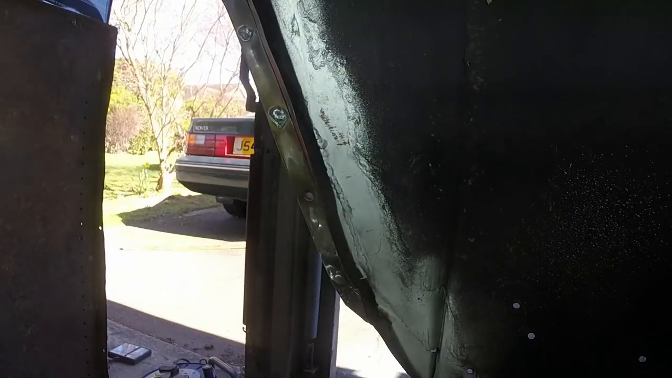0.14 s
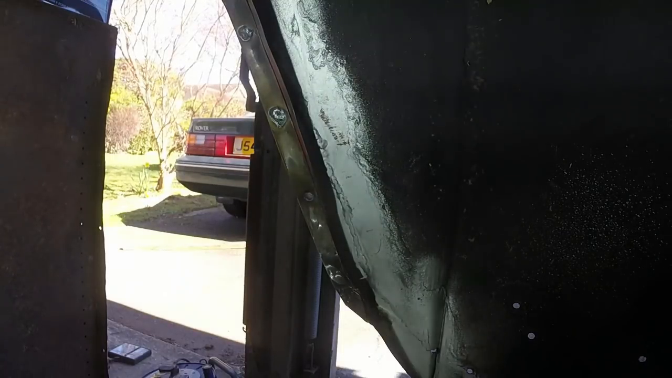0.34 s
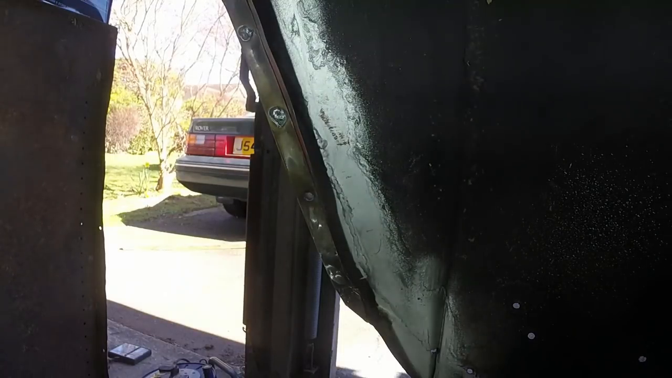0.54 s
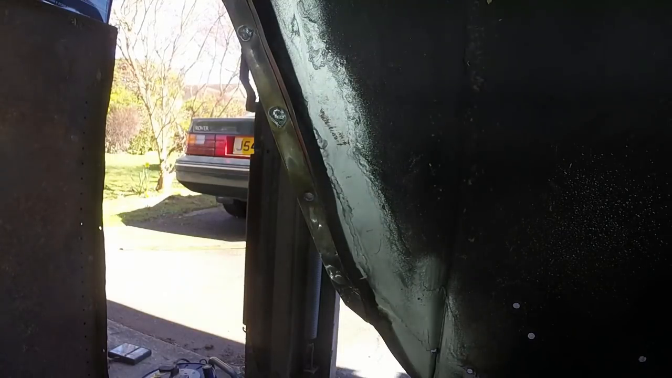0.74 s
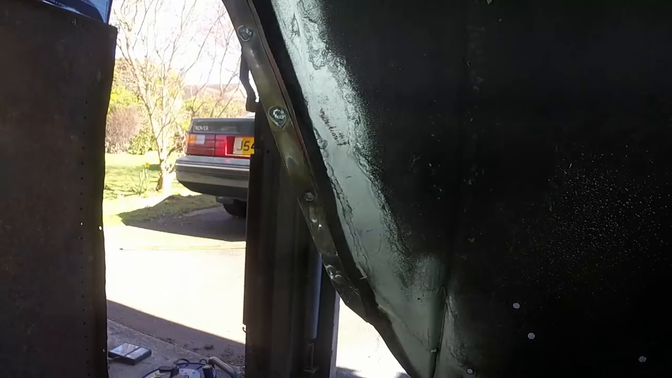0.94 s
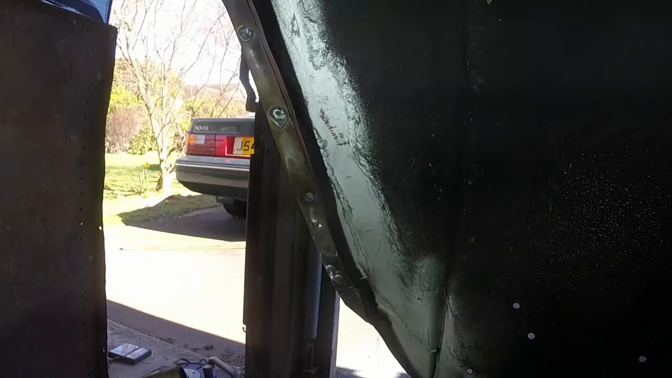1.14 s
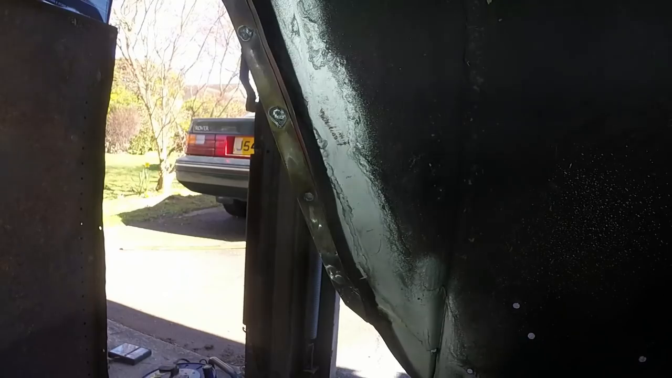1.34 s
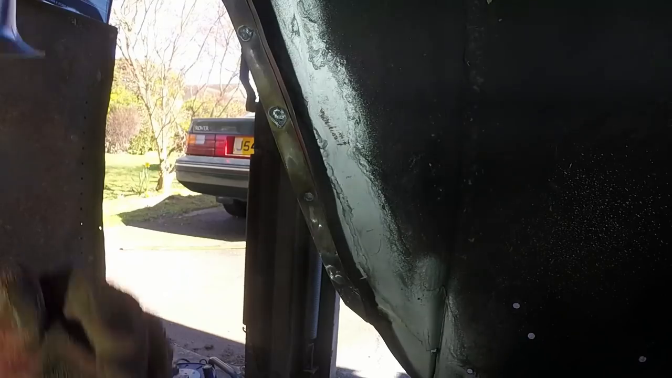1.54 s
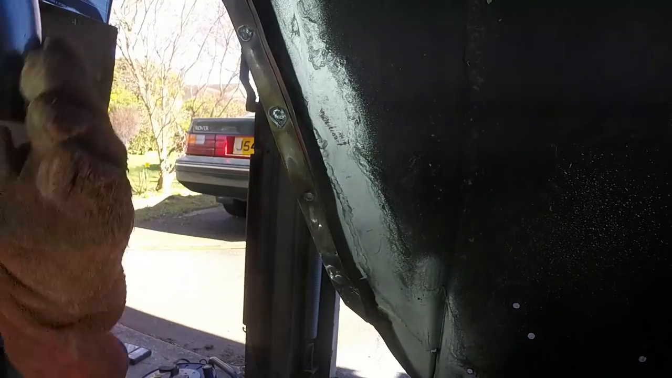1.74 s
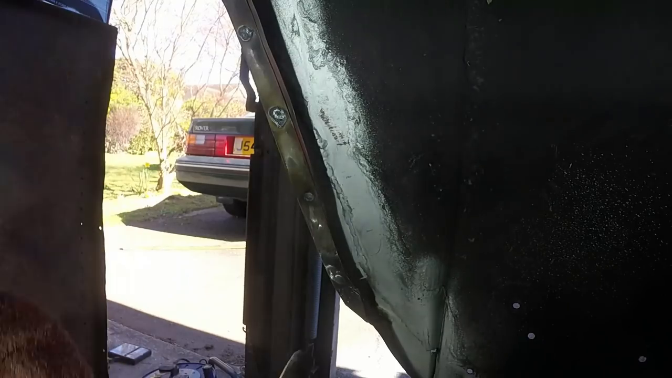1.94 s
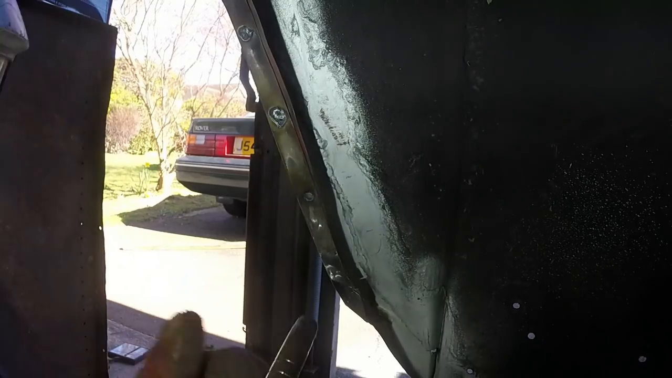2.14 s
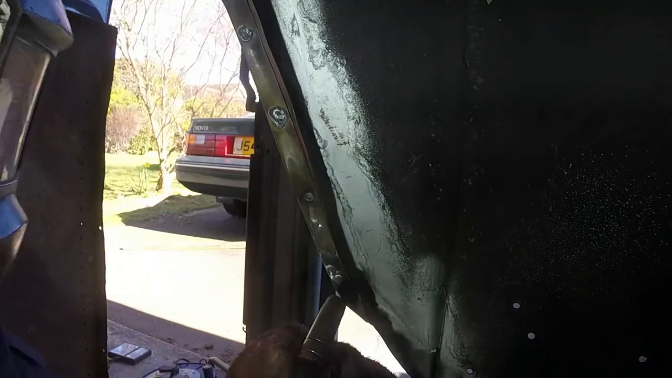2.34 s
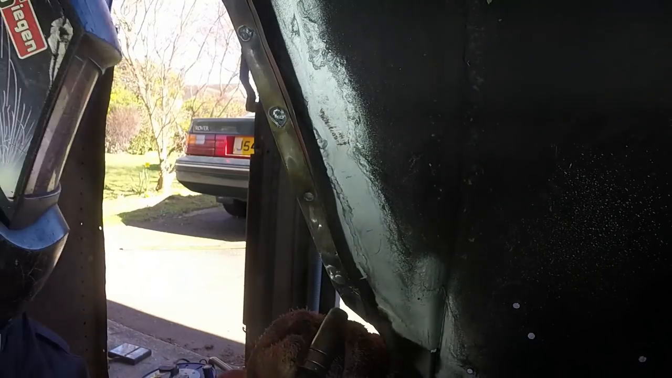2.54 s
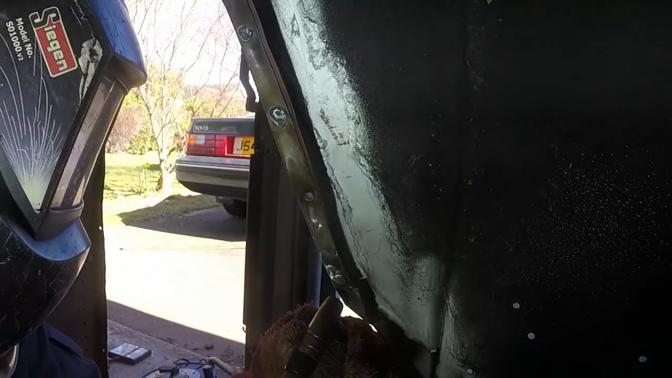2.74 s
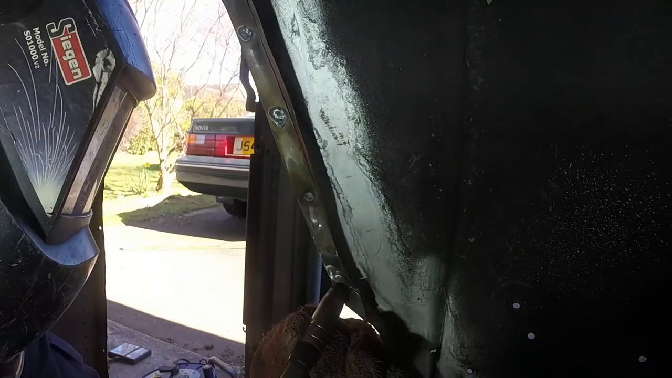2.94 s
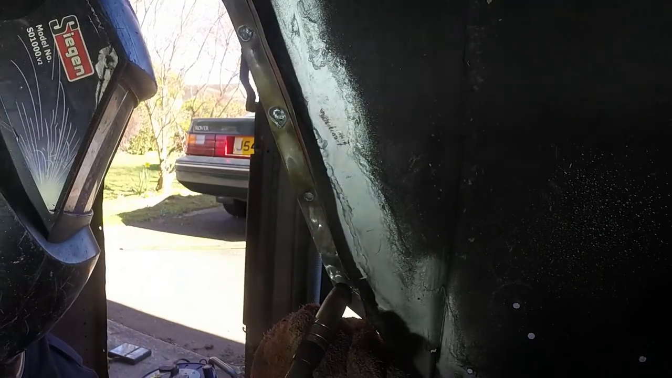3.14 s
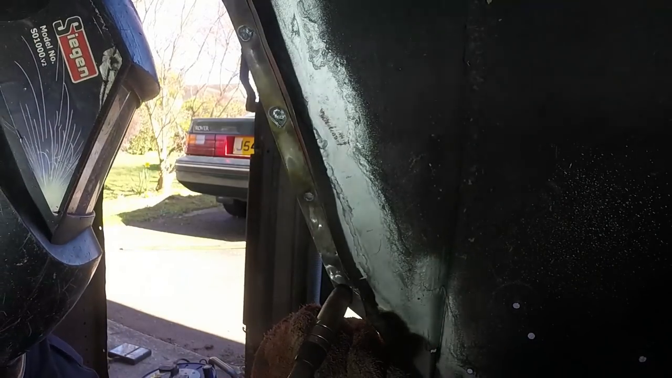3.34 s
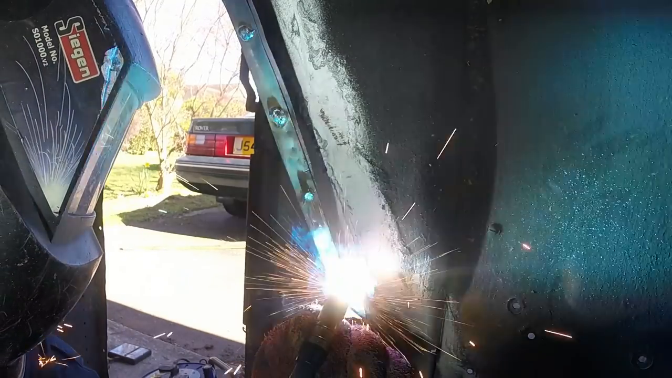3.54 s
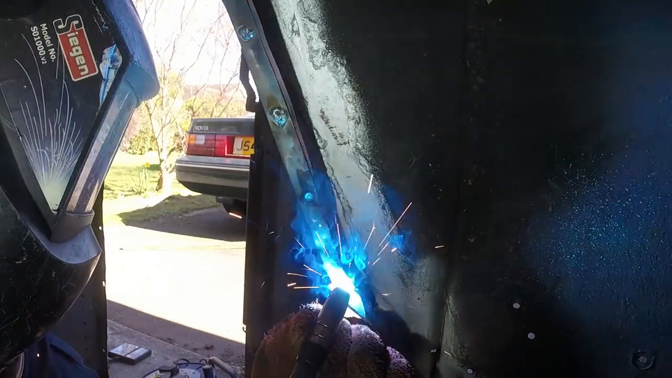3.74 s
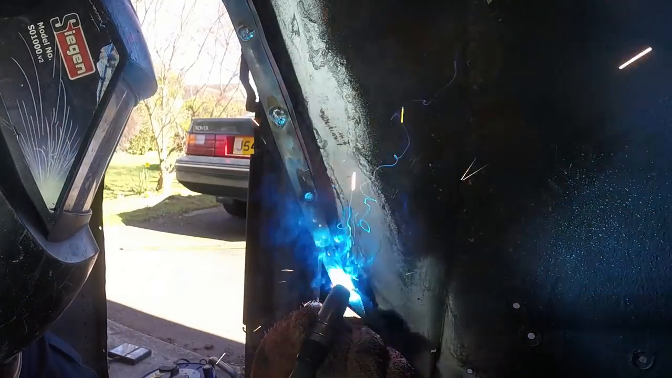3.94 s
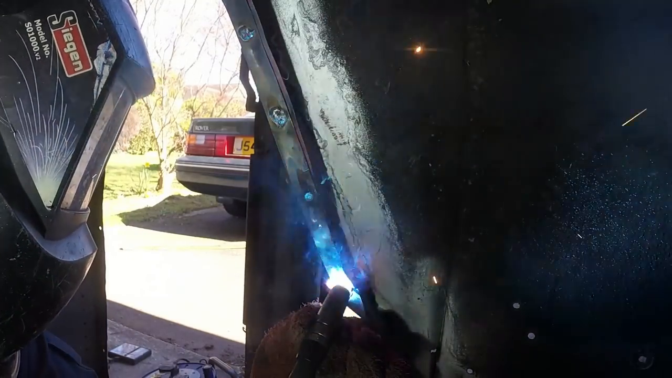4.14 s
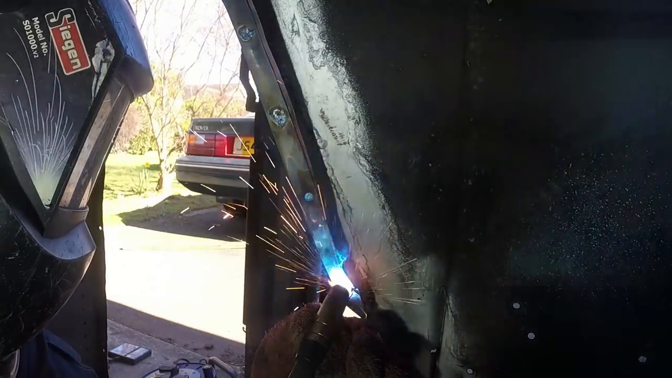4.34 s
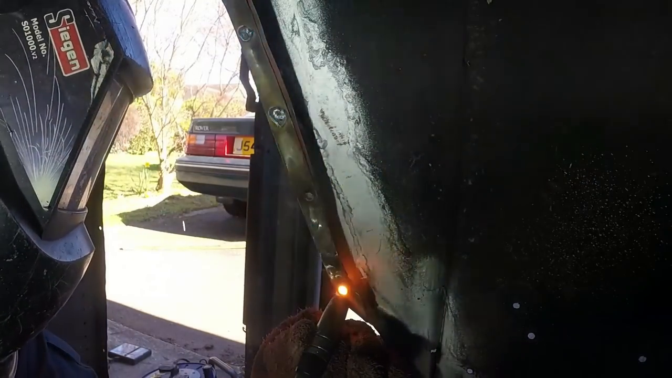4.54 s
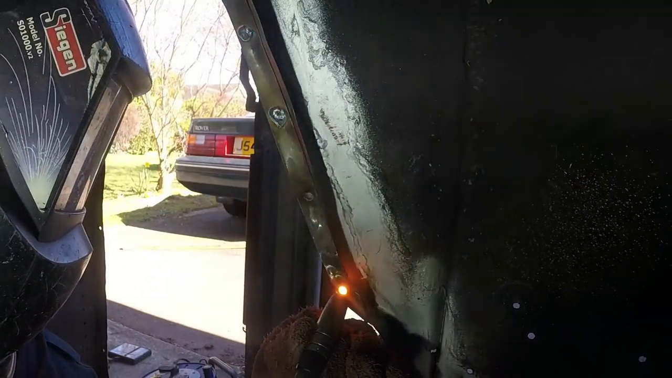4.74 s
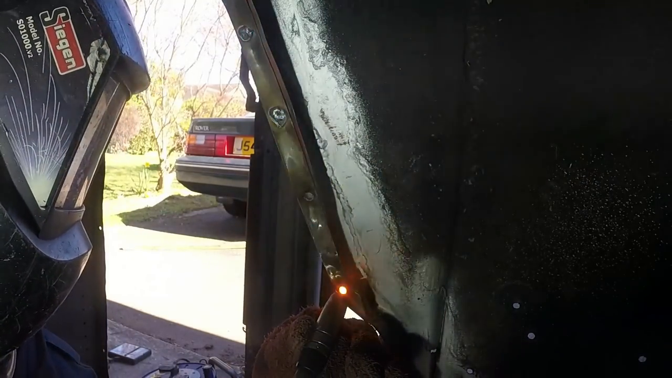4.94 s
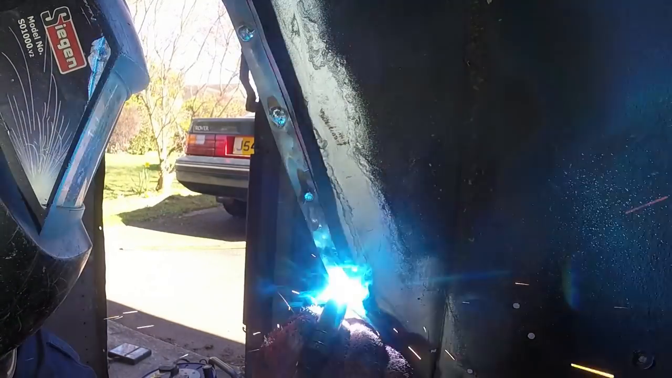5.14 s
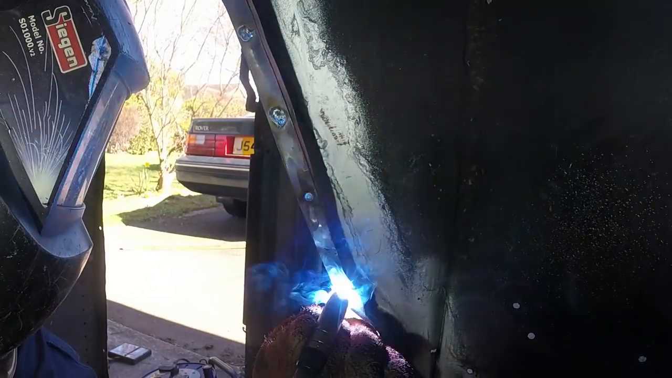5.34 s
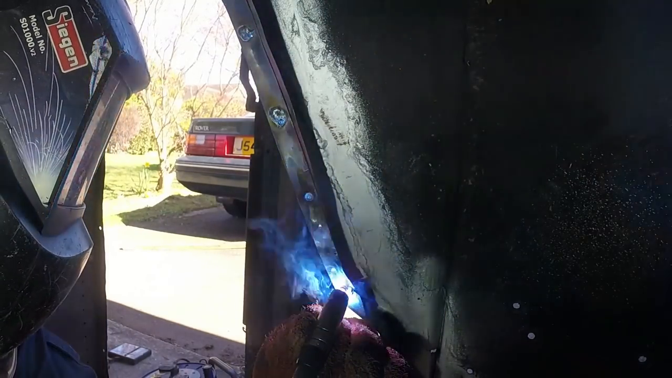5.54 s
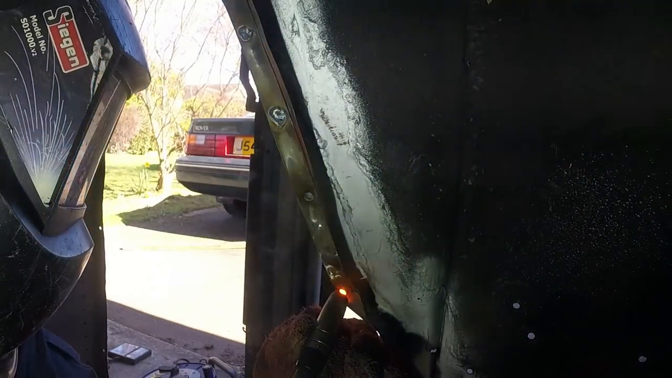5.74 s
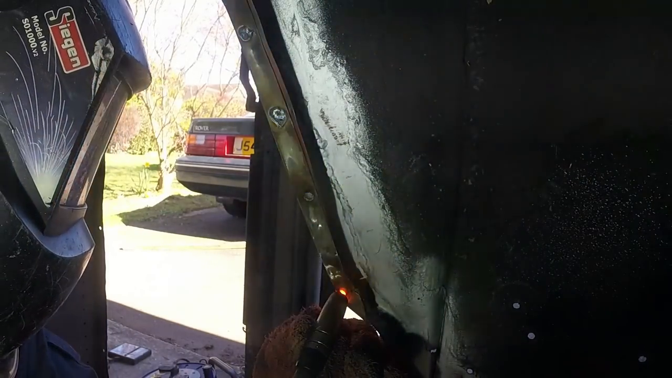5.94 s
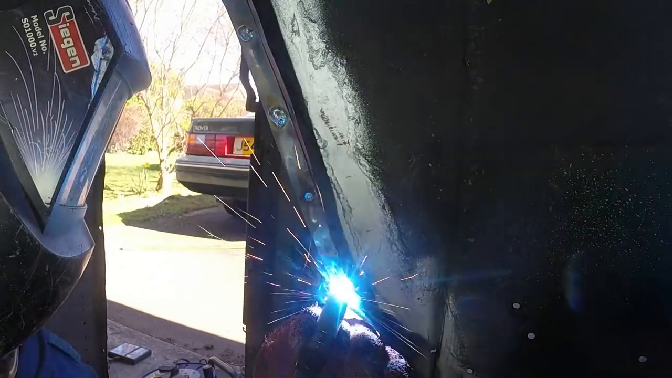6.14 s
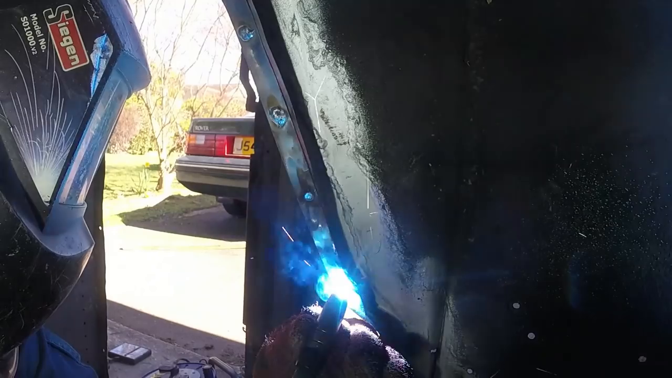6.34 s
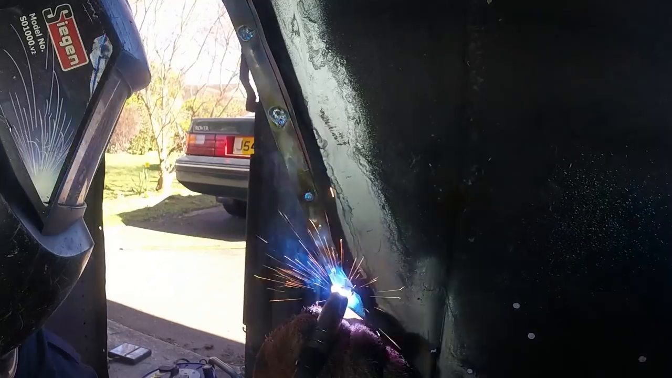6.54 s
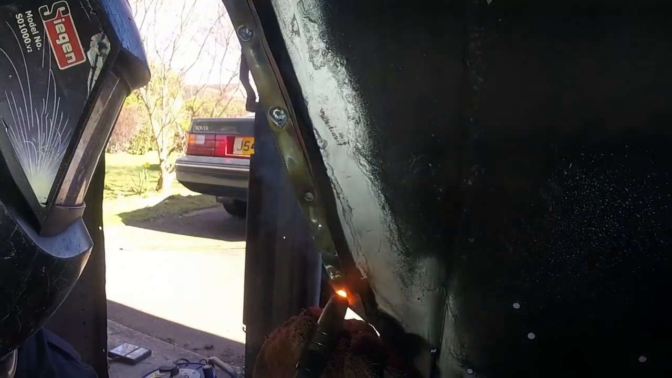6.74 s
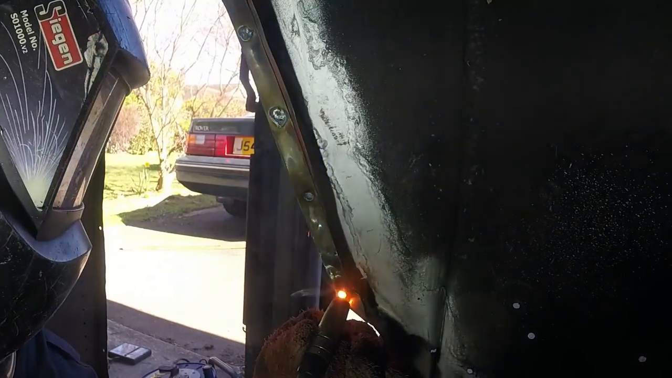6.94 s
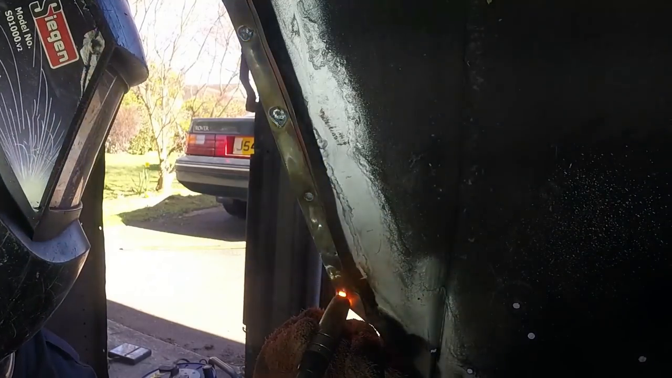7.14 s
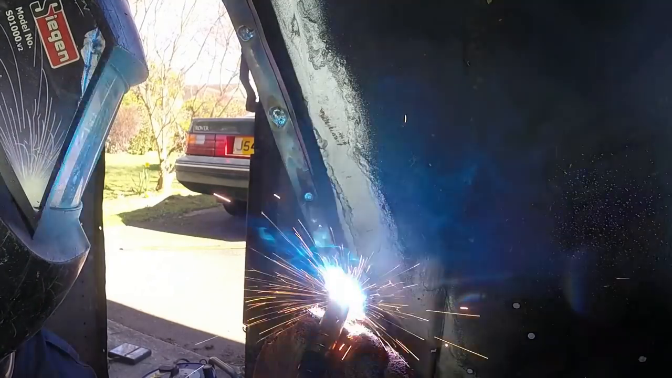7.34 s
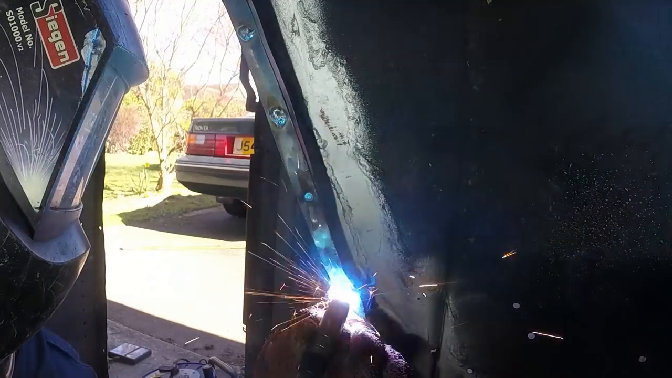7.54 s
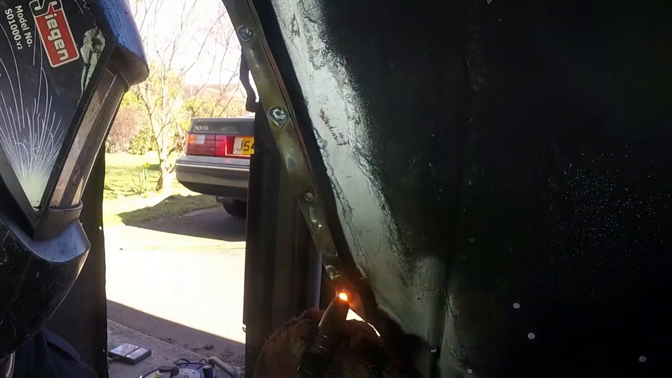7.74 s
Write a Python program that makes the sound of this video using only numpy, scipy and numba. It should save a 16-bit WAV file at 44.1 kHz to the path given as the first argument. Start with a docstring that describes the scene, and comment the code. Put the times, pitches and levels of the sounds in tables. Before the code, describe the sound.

Clothes rustle and a visor knocks down before a humming welder puffs gas and lays four brief, popping, sizzling welds on steel.

```python
"""A wire-feed welder makes short welds on a steel panel in a garage doorway.
Gas puffs and hisses from the nozzle, the arc fizzes, and it pops as each drop of melted wire makes
and breaks a short circuit. One weld only hisses and sizzles. The panel rings and the walls echo.
The machine hums over soft background noise and groans under sudden load. Before the welding,
metal parts tick, the worker's clothes rustle and a visor drops with a knock."""
import sys
import numpy as np
from scipy import signal
from scipy.fft import rfft, irfft
from scipy.io import wavfile
from scipy.ndimage import uniform_filter1d
from numba import njit

SR = 44100
rng = np.random.default_rng(int(sys.argv[2]) if len(sys.argv) > 2 else 0)


def unload_audio(sound):
    """Save the sound as a 16-bit wav file, at the path given as the first command line argument."""
    columns = np.transpose(np.atleast_2d(sound))
    # keep every value between -1 and 1, then stretch to whole-number steps
    steps = np.round(np.clip(columns, -1, 1) * 32767)
    wavfile.write(sys.argv[1], SR, steps.astype(np.int16))


N = 343539
T = np.arange(N) / SR
RIPPLE_HZ = 100  # the welding current pulses with the mains power

# tone of the background noise (frequency [Hz], relative level [dB])
AIR_TONE = [(15, -52.5), (25, -20.5), (69, -20.5), (113, -27.5), (129, -11.5), (152, -16.5), (246, -9.5),
            (267, -24), (331, -28.5), (614, -23), (666, -30.5), (848, -28.5), (1340, -35.5), (3000, -45.5),
            (15500, -68)]
# the machine's hum tones (frequency [Hz], waver rate [Hz], wavering share [0-1])
HUM_TONES = [(64.6, 10, .9), (100, 4, .2), (150.3, 3, .08), (194, 12, .35), (241, 4, .15)]
# strength of each hum tone (level [dB], change while the trigger is held [dB])
HUM_LEVELS = [(-54.5, -1), (-57, 9.5), (-42, -2.5), (-41, -1.5), (-48.5, -4.5)]
# the fourth hum tone swells and sinks (time [s], level change [dB])
HUM_THROB = [(0, -5.5), (0.22, 3), (0.56, -15), (0.67, 6.5), (0.78, -18), (0.98, 5), (1.1, -0.5), (2.4, -3),
             (2.75, 4), (3.41, 3), (3.9, -5), (4.56, 9), (4.97, -3.5), (5.1, 3), (5.29, -13), (5.55, 11),
             (5.71, -6), (5.81, 8), (6.2, 7), (6.6, -5), (6.88, 3), (7.24, -5.5), (7.35, 9), (7.55, 5),
             (7.79, -9)]
# small metal parts tick (time [s], level [dB])
METAL_TICKS = [(0.014, -46.5), (0.0237, -21.5), (0.0268, -18.5), (.034, -27.5), (2.444, -42.5),
               (2.49, -43.5), (2.608, -41.5), (2.636, -43), (2.692, -41), (2.745, -36.5)]
# notes those parts ring at (frequency [Hz], relative level [dB], ring time [relative])
METAL_NOTES = [(3140, 11.5, 0.023), (4690, -9, 0.029), (4770, 0.5, 0.19), (5460, -4, 0.12),
               (5770, 3, 0.095), (6680, 2.5, 0.1), (8180, 4, 0.12), (8543, -20, 0.21), (8769, -4, 0.12),
               (11200, -27, 0.11)]
# tone of their rattle (frequency [Hz], relative level [dB])
METAL_RATTLE = [(1200, -47), (2800, -5), (3800, -4), (5300, 9), (6500, 3), (8200, -8), (10000, -10),
                (15000, -23)]
# tone of the garage's echo (frequency [Hz], relative level [dB])
GARAGE_TONE = [(300, 1), (2000, -2.5), (6000, -6.5), (14000, -9.5)]
# clothes and gloves move (time [s], dull rub [dB], bright rustle [dB])
CLOTH_MOVES = [(0.3, -62, -77), (0.8, -61, -69), (1.0, -47.5, -56.5), (1.2, -46, -58.5), (1.39, -41.5, -52),
               (1.465, -46, -55), (1.65, -39.5, -51.5), (1.81, -54, -66), (1.9, -45.5, -59.5),
               (2.12, -47, -61), (2.2, -59, -65.5), (2.42, -52, -60.5), (2.45, -48.5, -52),
               (2.58, -44.5, -54.5), (2.66, -49.5, -53), (2.7, -39.5, -43), (2.82, -42, -46),
               (2.93, -58.5, -68), (3.1, -55, -65)]
# short scuffs of glove and sleeve, and the dull tail of the visor's knock
# (time [s], dull level [dB], bright level [dB])
SCUFFS_AND_VISOR_TAIL = [(0.762, -48, -79), (1.096, -36, -77), (1.258, -41, -59), (1.56, -35, -64),
                         (1.854, -31, -57), (2.164, -53.5, -47), (2.614, -45.5, -45), (2.674, -42.5, -43.5),
                         (2.688, -47, -47.5)]
# tone of the dull rub (frequency [Hz], relative level [dB])
RUB_TONE = [(250, -32.5), (450, -3), (800, 4), (1200, -3), (1500, -11), (2300, -10.5), (3200, -39.5)]
# tone of the bright rustle (frequency [Hz], relative level [dB])
RUSTLE_TONE = [(1500, -26.5), (3000, 8.5), (4700, 2), (6800, 2), (10000, -10), (15500, -28.5)]
# the visor's knock, rattles and small bumps (time [s], level [dB])
VISOR_KNOCKS = [(0.758, -34.5), (0.976, -32), (1.038, -34), (1.094, -30), (1.254, -36), (1.4826, -8.5),
                (1.486, -1.5), (1.496, -21), (1.509, -19.5), (1.54, -31.5), (1.55, -27), (1.635, -26.5),
                (1.659, -33), (1.829, -31.5), (1.85, -33.5), (2.108, -31.5), (2.16, -39), (2.493, -33),
                (2.606, -37.5), (2.669, -32), (2.734, -26)]
# notes the visor rings at (frequency [Hz], relative level [dB], ring time [relative])
VISOR_NOTES = [(337, -13.5, 0.25), (437, -13.5, 0.065), (628.4, -2, 0.295), (818, -4.5, 0.31),
               (903, -0.5, 0.14), (1034, 1.5, 0.22), (1140, -3.5, .2), (1690, -10, 0.089), (1950, -4, 0.11),
               (2150, -7.5, .08), (3020, -17.5, 0.2)]
# tone of its rattle (frequency [Hz], relative level [dB])
VISOR_RATTLE = [(150, -23.5), (350, 1.5), (800, 8), (1200, -7.5), (2000, -9.5), (3000, -17.5),
                (7000, -21.5), (12000, -41.5)]
# trigger pulls (gas on [s], gas off [s], valve opening time [s], puff hiss [dB], puff fizz [dB])
TRIGGER_PULLS = [(3.118, 4.49, 0.032, -34.5, -49), (4.983, 5.688, 0.016, -32, -44.5),
                 (5.814, 6.787, 0.009, -37, -57.5), (7.192, 7.9, 0.011, -32, -43)]
# tones of the torch's bright hiss and duller fizz (frequency [Hz], relative level [dB])
HISS_TONE = [(1300, -24), (1800, -10), (2300, -11), (3000, -11), (4500, -18), (5800, -2.5), (6800, 2),
             (8500, -1.5), (10000, 1), (15000, -4)]
FIZZ_TONE = [(300, -19.5), (800, -4.5), (1150, -3.5), (1600, -13), (2500, -11.5), (4000, -5),
             (8000, -21.5)]
# how the way from torch to microphone shapes the tone (frequency [Hz], relative level [dB])
PATH_TONE = [(30, -40.5), (150, -11), (310, -7.5), (400, -13.5), (520, -8), (750, -11), (1080, -0.5),
             (1240, -6.5), (1400, 1), (1610, -3.5), (1720, 2.5), (2400, -2.5), (2600, -13), (2950, -10),
             (3300, -8), (4300, -11.5), (5500, -10), (7000, -10.5), (10000, -14), (13000, -23),
             (15500, -22.5)]
# direct sound, then bounces off panel, floor and frame (delay [s], strength [signed factor])
PATH_ARRIVALS = [(0, 1), (.00007, .7), (.00016, .5), (.00048, -.45), (.00068, -.6), (.00107, -.6),
                 (.00127, .4), (.00147, -.45), (.00186, .65), (.0024, -.45), (.00274, .55), (.00292, .4),
                 (.00322, -.7), (.00376, .35), (.00524, .35)]
# notes the steel panel rings at (frequency [Hz], width [Hz], relative level [dB])
PANEL_NOTES = [(1100.5, 8.5, 11), (1360, 67, -21.5), (1760, 160, 2.5), (2440, 59, 11), (3470, 85, -5.5),
               (5640, 97, -9), (5440, 43, -20), (6740, 83, -12.5), (6100, 26, -11), (6600, 310, -16),
               (7250, 150, -25), (8320, 150, 0.5), (8860, 43, -18.5), (9840, 110, -19.5)]
# the wire meets the steel (time [s], fizz [dB], hiss [dB])
WIRE_TOUCHES = [(3.52, -38.5, -56), (5.183, -30.5, -53), (6.15, -34, -60.5), (7.366, -33.5, -56)]
# single short circuits clearing (time [s], relative level [dB], extra treble crack [dB])
SINGLE_POPS = [(3.5347, -10.5, -1.5), (3.5438, -4.5, 0.3), (3.603, -12, -4.5), (3.615, -10, -2.5),
               (3.6349, -9, -5), (3.6546, -8, -3.5), (3.6862, -7.5, -1), (3.7168, -7.5, -5),
               (3.7446, -9.5, -1.5), (3.758, -12, -2), (3.7862, -4.5, -0.5), (3.8142, -8.5, -2),
               (3.848, -10.5, -2.5), (3.8938, -11.5, -1.5), (3.928, -8, 0), (3.9446, -4.5, -4),
               (3.966, -6, -3), (4.0086, -10.5, -2), (4.0389, -14.5, 0), (4.0659, -5, -2.5),
               (4.0978, -10, -1.5), (4.125, -6, -4), (4.1456, -7.5, -3.5), (4.18, -13, -5.5),
               (5.2166, -2, 0), (5.58, -29, -1.5), (6.1668, -4, 1.8), (6.2814, -13, 1.5),
               (6.313, -14, -1.5), (6.3383, -5, -1.5), (6.3683, -4, -3.5), (6.3797, -7.5, -5.6),
               (6.3988, -3.5, -2.5), (6.4395, -3, 0), (6.499, -5.5, 2.5), (6.54, -3.5, -2),
               (6.6471, -11.5, -4.5), (6.7464, -8, -7), (6.7668, -14, -7), (6.782, -9, 0.5),
               (7.3805, -4, 2), (7.4045, -14, 2), (7.5215, -3.5, -5.5), (7.5884, -3, -3.5),
               (7.6296, -7.5, -4), (7.6589, -8.5, -4.5)]
# buzzing runs of pops (start [s], end [s], spacing [current pulses],
# first relative level [dB], last relative level [dB], extra treble crack [dB])
POP_RUNS = [(4.2053, 4.23, 1, -11.5, -7, -2), (4.2855, 4.34, 1, -7.5, -4.5, -3.5),
            (4.3542, 4.39, 1, -8.5, -6, -3), (4.396, 4.46, 1, -7.5, -6.5, -3),
            (6.2284, 6.263, 1, -2.5, -11, -1), (6.6066, 6.632, 1, -9, -16.5, -2.5),
            (6.6865, 6.702, 1, -13, -8, -8.5), (6.7154, 6.732, 1, -11.5, -8, -4),
            (7.4498, 7.504, 1, -10, -14.5, -2), (7.6813, 7.77, 2, -3, -10.5, -2.5)]
# the arc burns between pops (start [s], end [s], hiss [dB], fizz [dB])
ARC_BURNS = [(3.597, 4.47, -35.5, -40.5), (6.218, 6.8, -38.5, -36), (7.435, 7.8, -36, -30.5)]
# the transformer groans (start [s], level [dB], length [s])
LOAD_GROANS = [(5.165, -24, 0.063), (6.119, -22, 0.074), (7.333, -16.5, 0.064)]
# one weld burns smoothly (time [s], hiss [dB], fizz [dB], sizzle [dB])
SMOOTH_WELD = [(5.25, -51, -43, -55), (5.3, -46.5, -47, -54), (5.41, -62, -50, -59),
               (5.49, -65, -49, -58.5), (5.52, -54.5, -50, -51), (5.566, -62, -43.5, -60),
               (5.59, -50, -45.5, -56.5), (5.612, -33.5, -45, -37), (5.66, -51.5, -47.5, -51),
               (5.69, -53.5, -55.5, -57), (5.73, -70, -60.5, -73)]
# tone of its tiny sparks (frequency [Hz], relative level [dB])
SPARK_TONE = [(4000, -30), (8000, -11), (11000, -4), (14000, -3), (16000, -8)]


def undb(db):
    """Turn decibels into a number to multiply by."""
    return 10 ** (np.asarray(db) / 20)


def unit(x):
    """Scale a signal to an average power of 1."""
    return x / np.sqrt(np.mean(x ** 2))


def colour(tone, size=2048):
    """A short click with the given tone, for use as a filter."""
    hz, db = np.transpose(tone)
    log_hz = np.log(np.fft.rfftfreq(2 * size, 1 / SR) + 1)
    cepstrum = irfft(np.log(undb(np.interp(log_hz, np.log(hz), db))))
    cepstrum[1:size] *= 2  # folding moves the energy to the start of the click
    cepstrum[size + 1:] = 0
    return irfft(np.exp(rfft(cepstrum)))[:size]


def through(x, response):
    """Let every sample of x set off the response; keep the length of x."""
    return signal.fftconvolve(x, response)[:len(x)]


def noise(tone):
    """Steady noise with the given tone."""
    return unit(through(rng.standard_normal(N), colour(tone)))


def walk(rate_hz):
    """A smooth random wobble, about 1 in size."""
    step = int(SR / rate_hz)
    levels = np.repeat(rng.standard_normal(N // step + 1), step)
    return unit(uniform_filter1d(uniform_filter1d(levels, step), step)[:N])


def curve(table, column, hold_s):
    """Loudness that follows a table column, holds briefly at the end and is silent outside."""
    rows = np.array(table)
    fade = np.clip(np.minimum(T - rows[0, 0], rows[-1, 0] + hold_s - T) / 0.01, 0, 1)
    return fade * undb(np.interp(T, rows[:, 0], rows[:, column]))


def bump(time, rise_s, fall_s):
    """Swell to 1 at the given time, then die away."""
    return np.exp(-np.where(T < time, (time - T) / rise_s, (T - time) / fall_s))


def blows(times, db):
    """Sharp pushes, each one sample long."""
    out = np.zeros(N)
    np.add.at(out, np.minimum(np.asarray(times) * SR, N - 1).astype(int), undb(db))
    return out


def tail(fade_s):
    """Half a second of noise that falls by 60 dB every fade_s."""
    t = T[:SR // 2]
    return rng.standard_normal(len(t)) * undb(-60 * t / fade_s)


def air():
    """Soft, low background noise whose level drifts."""
    return undb(-43.5 + walk(3.8)) * noise(AIR_TONE)


def machine_hum():
    """Fan and transformer tones waver, and change level while the trigger is held."""
    held = sum(1. * (T > on) * (T < off) for on, off, *_ in TRIGGER_PULLS)
    load = uniform_filter1d(held, size=4410)
    gains = [undb(db + change_db * load) for db, change_db in HUM_LEVELS]
    gains[3] *= undb(np.interp(T, *np.transpose(HUM_THROB)))
    out = 0
    for gain, (hz, rate_hz, share) in zip(gains, HUM_TONES):
        waver = np.sqrt(1 - share) + np.sqrt(share / 2) * (walk(rate_hz) + 1j * walk(rate_hz))
        out += gain * np.sqrt(2) * np.real(waver * np.exp(2j * np.pi * hz * T))
    return out


def garage_echo():
    """Many small bounces off the walls blur into a short, dull echo."""
    fade_in = np.clip(T[:SR // 2] / 0.0033, 0, 1)
    return undb(-29.5) * fade_in * through(tail(fade_s=0.24), colour(GARAGE_TONE))


def ring(notes, rattle_tone, ring_scale_s, rattle_db, rattle_s):
    """One hit on an object: fading notes, a loose rattle and the garage's echo."""
    t = T[:SR // 2]
    ringing = sum((-1) ** k * undb(db - 60 * t / (ring_scale_s * length)) * np.sin(2 * np.pi * hz * t)
                  for k, (hz, db, length) in enumerate(notes))
    rattle = through(tail(rattle_s), colour(rattle_tone))
    hit = ringing / np.abs(ringing).max() + undb(rattle_db) * rattle / np.abs(rattle).max()
    return hit + through(hit, garage_echo())


def metal_ticks():
    """Light taps make small metal parts ring high and briefly."""
    tick = ring(METAL_NOTES, METAL_RATTLE, ring_scale_s=0.27, rattle_db=0.5, rattle_s=0.054)
    return through(blows(*np.transpose(METAL_TICKS)), tick)


def clothes():
    """Moving cloth rubs, rustles and scratches; one dull burst is the tail of the visor's knock."""
    rub, rustle = (curve(CLOTH_MOVES, column, hold_s=0.091) for column in (1, 2))
    for time, dull_db, bright_db in SCUFFS_AND_VISOR_TAIL:
        burst = bump(time, rise_s=0.0055, fall_s=0.0058)
        rub += undb(dull_db) * burst
        rustle += undb(bright_db) * burst
    folds = blows(rng.uniform(0, T[-1], size=600), 3.2 * rng.exponential(size=600) - 6)
    scratches = unit(1 + through(folds, np.exp(-T[:800] / 0.0045)))
    grain = undb(0.65 * walk(40.5))
    return grain * (rub * noise(RUB_TONE) + rustle * scratches * noise(RUSTLE_TONE))


def visor():
    """The visor bumps, drops and rattles; each hit rings its shell."""
    knock = ring(VISOR_NOTES, VISOR_RATTLE, ring_scale_s=0.32, rattle_db=-1.5, rattle_s=0.034)
    return through(blows(*np.transpose(VISOR_KNOCKS)), knock)


def gas_flow():
    """Loudness of (hiss, fizz) as the valve lets out a puff of gas, then a gentle flow."""
    puff_fall_db_per_s, flow_fall_db_per_s, closing_s = 231, 12, 0.06
    gains = np.zeros((2, N))
    for on, off, opening_s, hiss_db, fizz_db in TRIGGER_PULLS:
        t = T - on
        valve = np.clip(np.minimum(t / opening_s, (off - T) / closing_s + 1), 0, 1) ** 2
        puff = undb(-puff_fall_db_per_s * np.clip(t - opening_s, 0, 2))
        flow = undb(-52 - flow_fall_db_per_s * np.clip(t, 0, 0.4))
        gains += valve * (np.outer(undb([hiss_db, fizz_db]), puff) + flow)
    return gains


def torch_path():
    """How a click at the torch arrives: directly, in bounces, and as the panel's ring."""
    t = T[:SR // 2]
    scatter = through(tail(fade_s=0.048) * np.clip(t / 0.004, 0, 1), colour(GARAGE_TONE))
    arrivals = undb(-11.5) * scatter + garage_echo()
    for delay, strength in PATH_ARRIVALS:
        arrivals[round(delay * SR)] += strength
    for hz, width, db in PANEL_NOTES:
        fade = np.exp(-np.pi * width * t)  # wider notes die sooner
        arrivals += undb(db + 4) * 2 * np.pi * width / SR * fade * np.cos(2 * np.pi * hz * t)
    path = through(arrivals, colour(PATH_TONE))
    return path / np.abs(path).max()


def wire_touch():
    """Loudness of (hiss, fizz) as the wire meets the steel, just before the arc lights."""
    return sum(np.outer(undb([hiss_db, fizz_db]), bump(time, rise_s=0.016, fall_s=0.031))
               for time, fizz_db, hiss_db in WIRE_TOUCHES)


def short_circuits():
    """Time, level and crack of every pop; runs keep step with the pulsing current."""
    rows = [np.array(SINGLE_POPS)]
    for start, end, spacing, first_db, last_db, crack_db in POP_RUNS:
        times = np.arange(start, end, spacing / RIPPLE_HZ)
        time_luck, level_luck, crack_luck = rng.standard_normal((len(times), 3)).T
        swing_db = 0.5 * (-1) ** np.arange(len(times))  # strong and weak take turns
        db = np.linspace(first_db, last_db, len(times)) + swing_db + 1.46 * level_luck
        times += 0.0007 * time_luck * (times > start)
        rows.append(np.transpose([times, db, crack_db - swing_db + 1.5 * crack_luck]))
    return np.concatenate(rows).T


def droplet_pops():
    """Each drop's short circuit clears with a thump, a crack and a moment of spitting."""
    times, db, crack_db = short_circuits()
    low, high = (signal.butter(2, 3000, kind, fs=SR, output="sos") for kind in ("low", "high"))
    spit = through(blows(times, db + crack_db - 9), np.exp(-T[:600] / 0.002)) * rng.standard_normal(N)
    thump = signal.sosfilt(low, blows(times, db + 8))
    crack = signal.sosfilt(high, blows(times, db + crack_db + 10.5) + spit)
    return -(thump + crack)  # negative: the gas collapses inwards first


def arc_burn():
    """Loudness of (hiss, fizz) while the arc burns, smoothly or between pops."""
    gains = np.array([curve(SMOOTH_WELD, column, hold_s=0.018) for column in (1, 2)])
    for start, end, hiss_db, fizz_db in ARC_BURNS:
        burning = np.clip(np.minimum((T - start) / 0.005, (end - T) / 0.07 + 1), 0, 1) ** 2
        gains += np.outer(undb([hiss_db, fizz_db]), burning)
    return gains


def torch():
    """Pops, hiss and fizz leave the same spot, so they share the same echoes."""
    pops, path = droplet_pops(), torch_path()
    hiss = unit(through(noise(HISS_TONE), path))
    fizz = unit(through(noise(FIZZ_TONE), path))
    hiss_gain, fizz_gain = gas_flow() + wire_touch() + arc_burn()
    hiss_flicker, fizz_flicker = undb(walk(33)), undb(2 * walk(25))
    ripple = 1 + 0.67 * np.cos(2 * np.pi * RIPPLE_HZ * T)
    return (through(pops, path) + hiss_gain * hiss_flicker * hiss
            + fizz_gain * fizz_flicker * ripple * fizz)


def transformer_groans():
    """Two low tones swell as the touching wire suddenly loads the transformer."""
    out = 0
    for start, db, length in LOAD_GROANS:
        t = T - start
        swell = np.sin(np.pi * np.clip(t / length, 0, 1)) ** 2
        tones = np.sin(2 * np.pi * 150 * t) + 0.81 * np.sin(2 * np.pi * 201 * t + 1.2)
        out += undb(db) * swell * tones
    return out


def spark_sizzle(sparks_per_s=1500):
    """Tiny sparks sizzle high up during the smooth weld, pulsing with the current."""
    when, size = rng.uniform(size=(int(sparks_per_s * T[-1]), 2)).T
    bursts = through(blows(when * T[-1], -2 * np.log(size)), np.exp(-T[:400] / 0.001))
    sparks = unit(through(bursts * rng.standard_normal(N), colour(SPARK_TONE)))
    ripple = 1 + 0.5 * np.cos(2 * np.pi * RIPPLE_HZ * T)
    return curve(SMOOTH_WELD, 3, hold_s=0.02) * ripple * sparks


def scene():
    """Add all the sounds into one channel."""
    welding = air() + torch() + spark_sizzle() + machine_hum() + transformer_groans()
    return (welding + metal_ticks() + clothes() + visor())[None]


@njit
def follow(x, rise_s, fall_s):
    """Track a level, with separate speeds for going up and down."""
    out, level = np.empty(len(x)), 0.
    for i in range(len(x)):
        level += (x[i] - level) / (SR * (rise_s if x[i] > level else fall_s))
        out[i] = level
    return out


def record(dry):
    """The volume dips by itself after loud moments; peaks are rounded and the top treble is cut."""
    limit_db, ratio, top_hz = -29.5, 1.81, 15400
    level = follow(uniform_filter1d(np.abs(dry[0]), size=441), rise_s=0.14, fall_s=1.)
    gain = np.minimum(undb(limit_db) / (level + 1e-9), 1) ** (1 - 1 / ratio)
    treble_cut = signal.ellip(8, 0.2, 60, top_hz, fs=SR, output="sos")
    return signal.sosfilt(treble_cut, np.tanh(dry * gain))


dry = scene()
out = record(dry)
unload_audio(out)
```